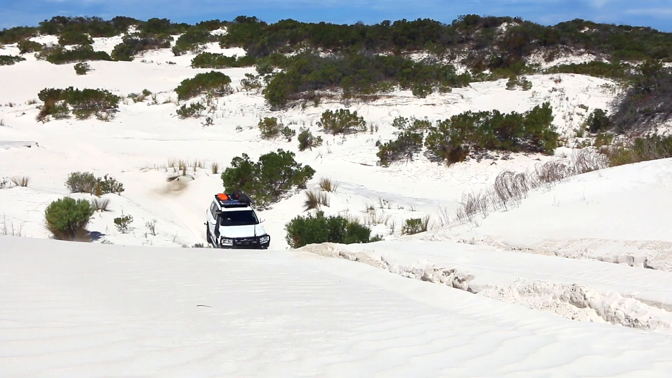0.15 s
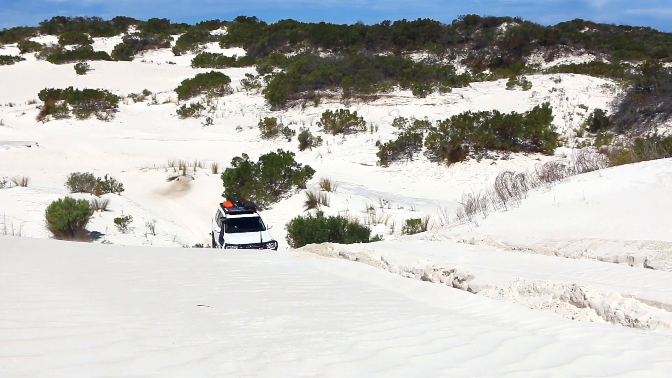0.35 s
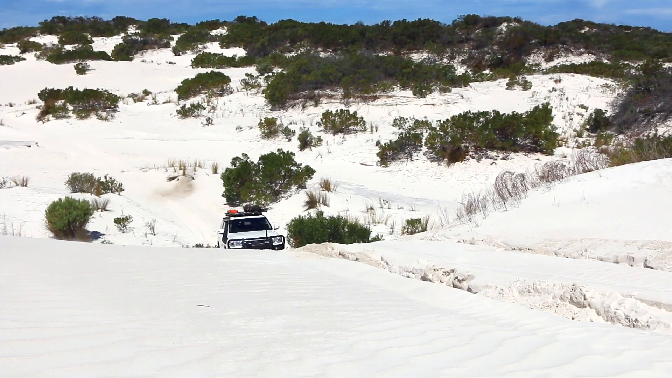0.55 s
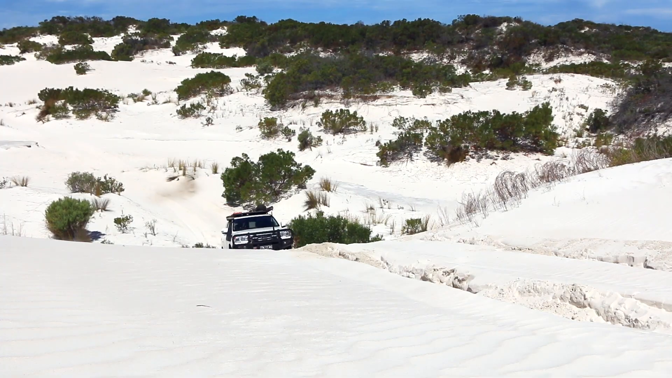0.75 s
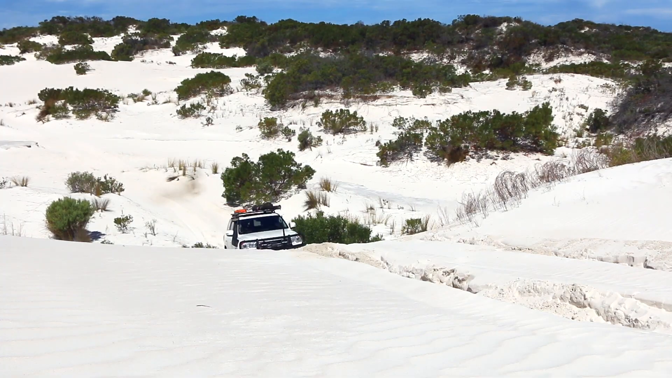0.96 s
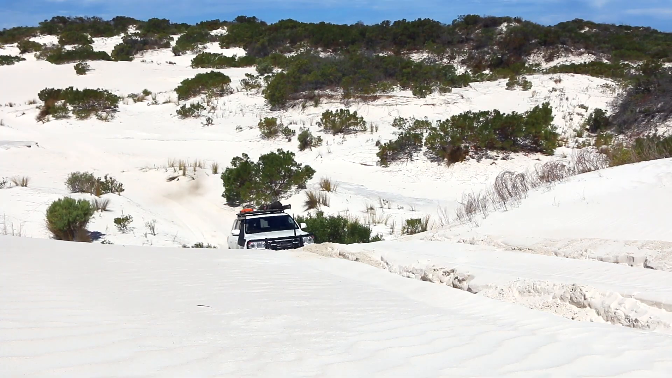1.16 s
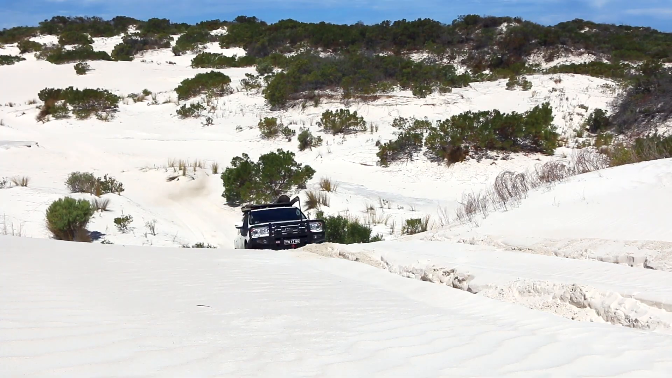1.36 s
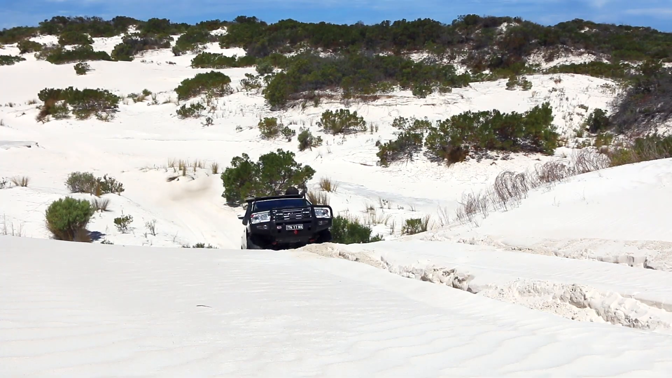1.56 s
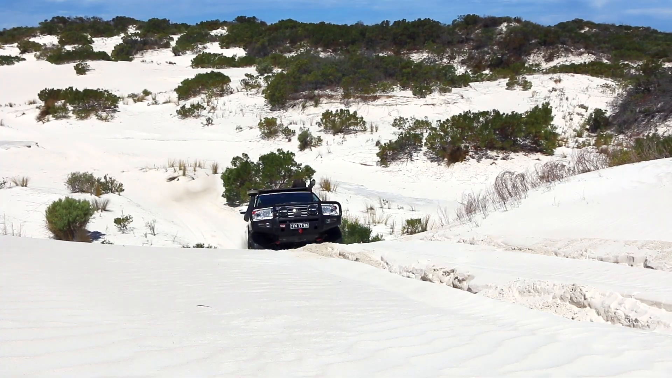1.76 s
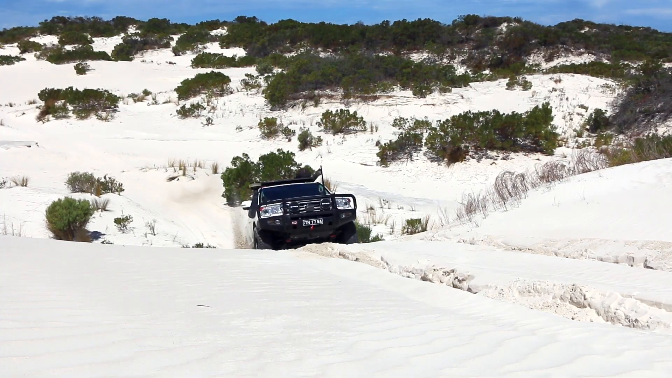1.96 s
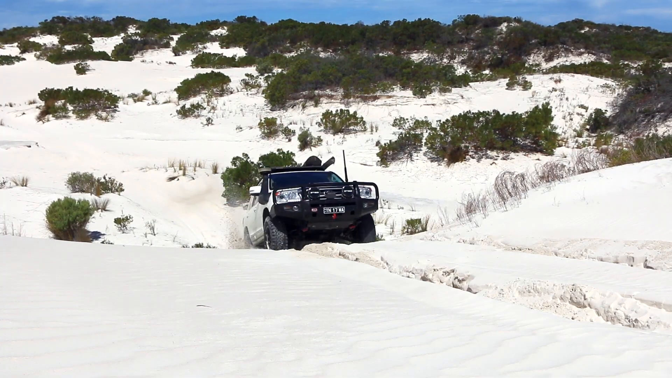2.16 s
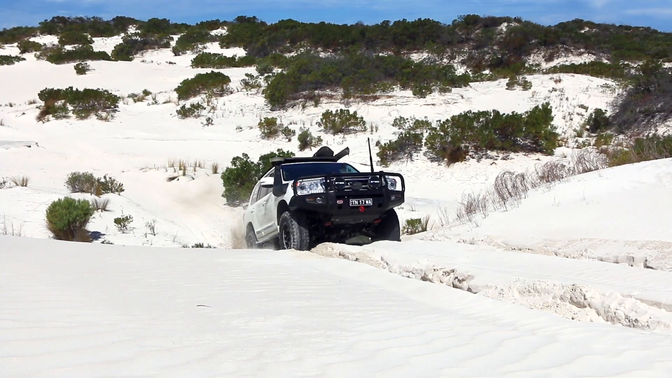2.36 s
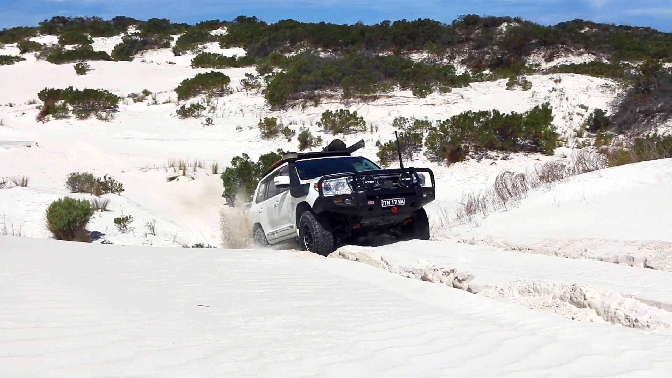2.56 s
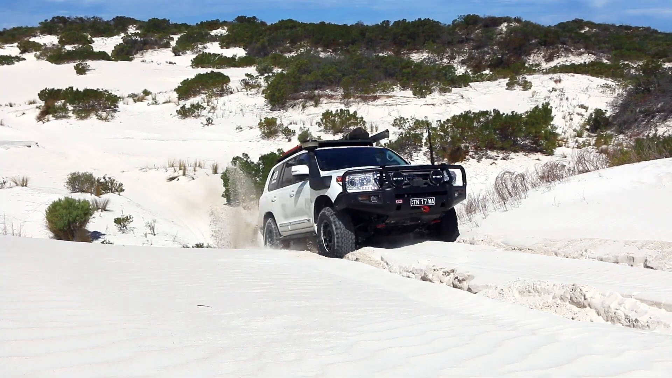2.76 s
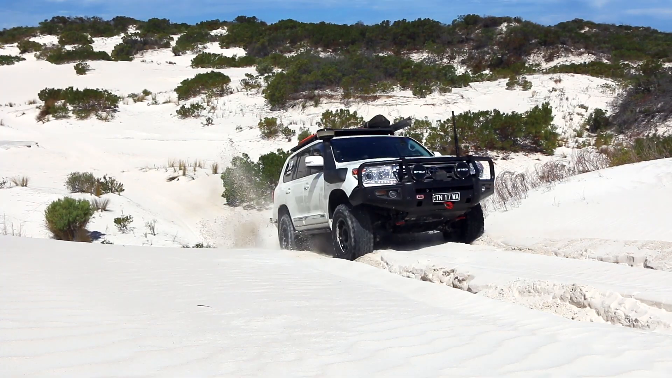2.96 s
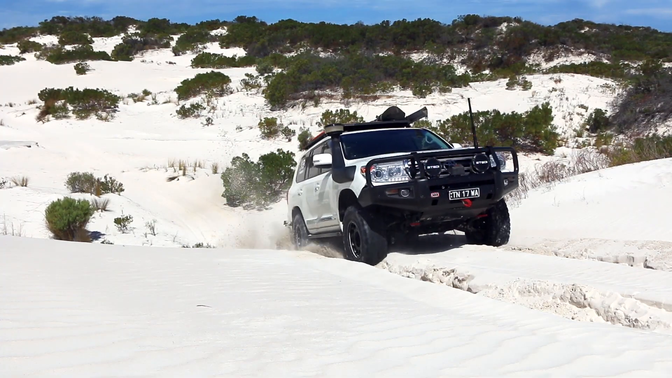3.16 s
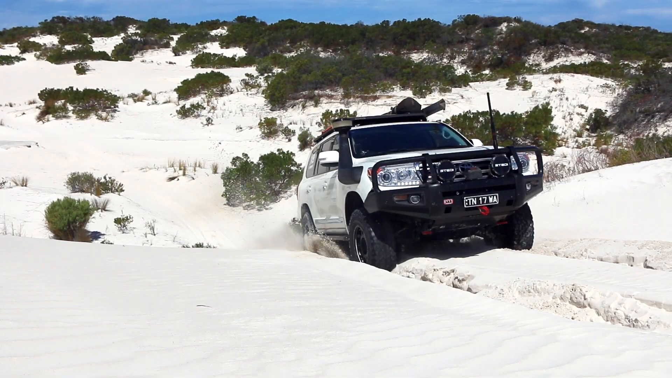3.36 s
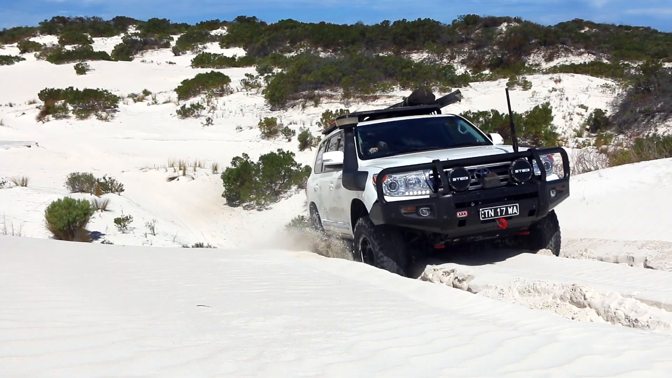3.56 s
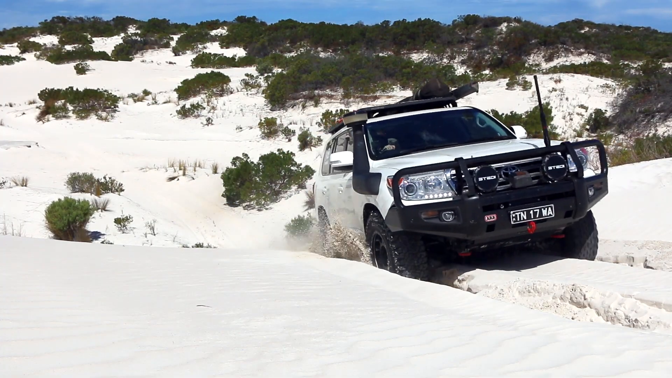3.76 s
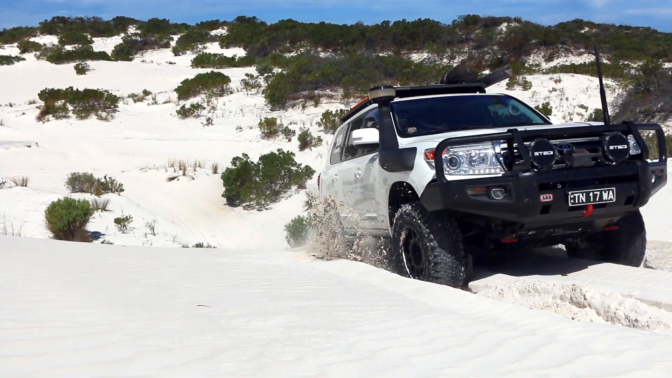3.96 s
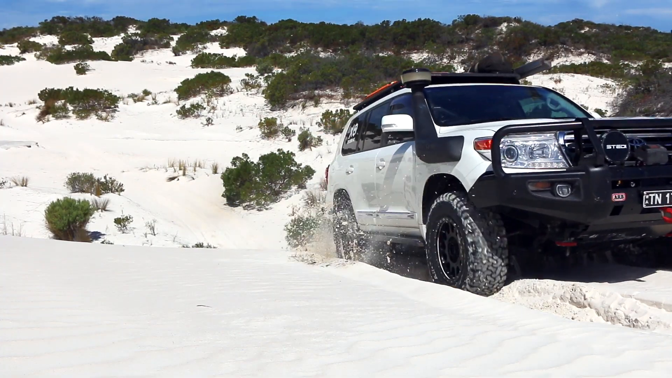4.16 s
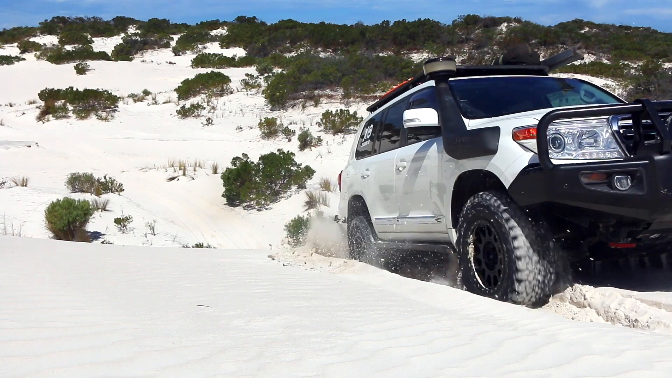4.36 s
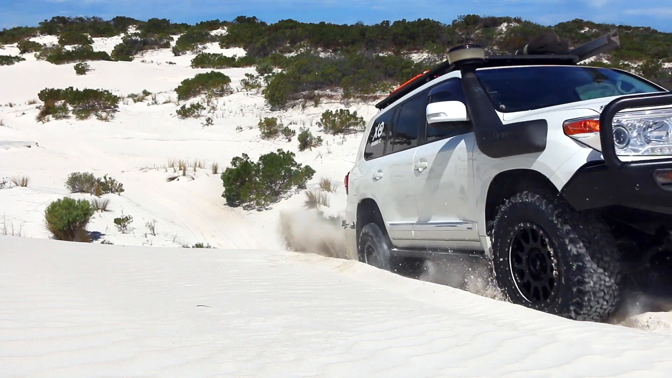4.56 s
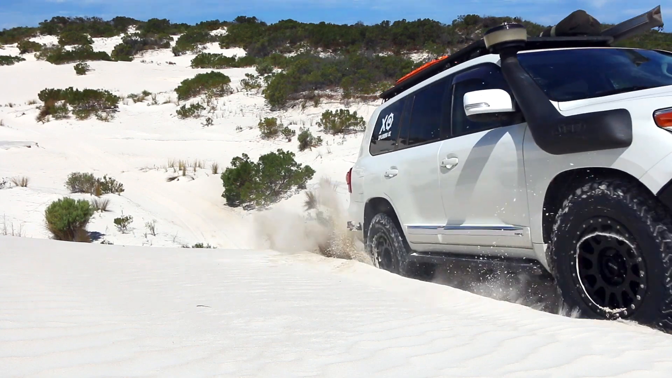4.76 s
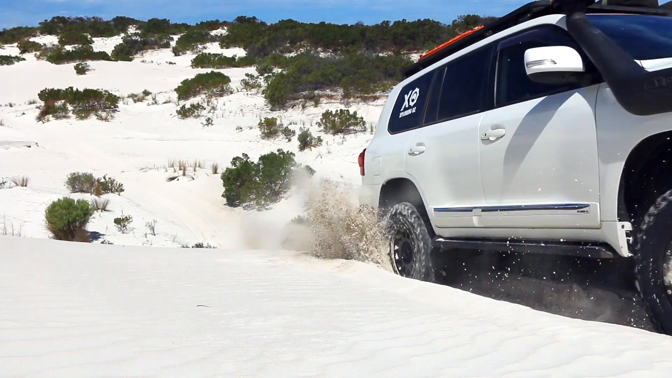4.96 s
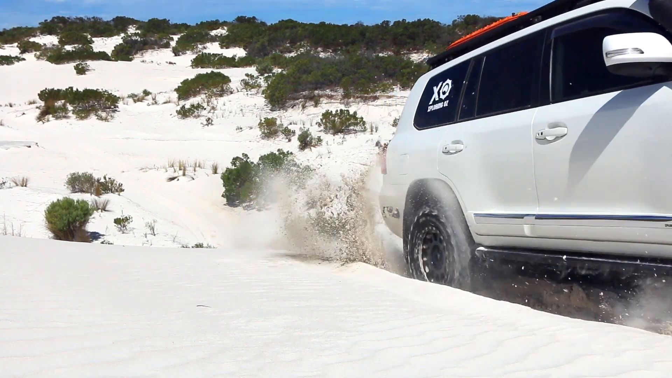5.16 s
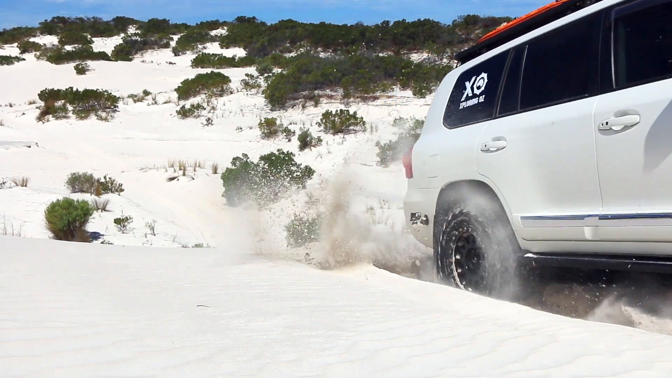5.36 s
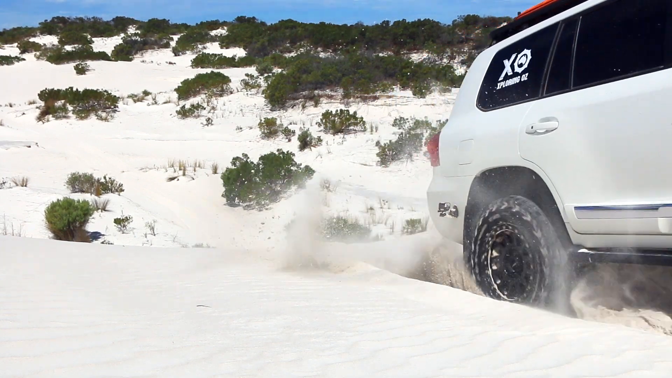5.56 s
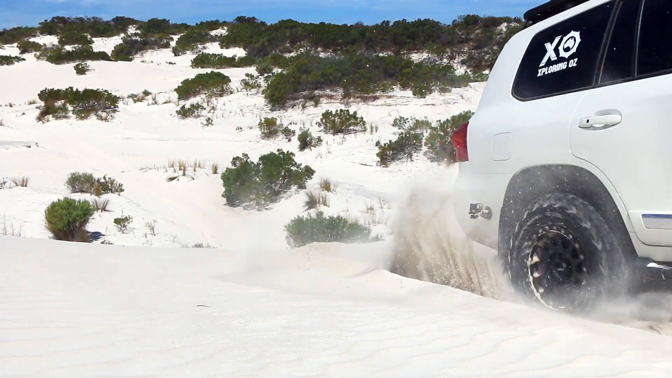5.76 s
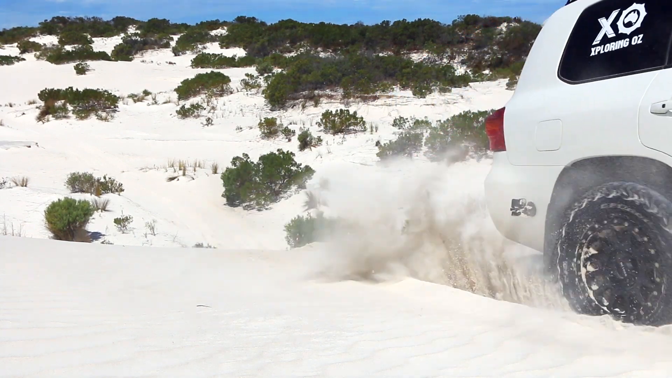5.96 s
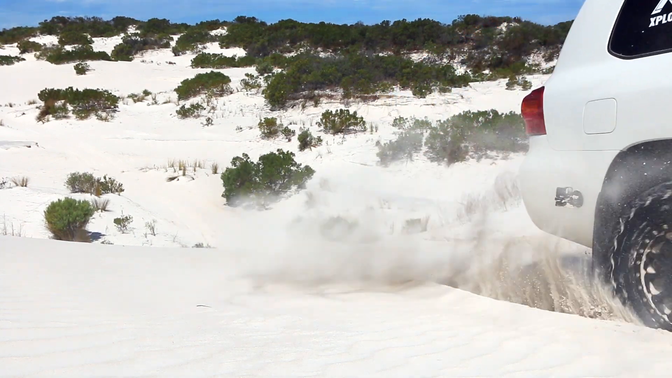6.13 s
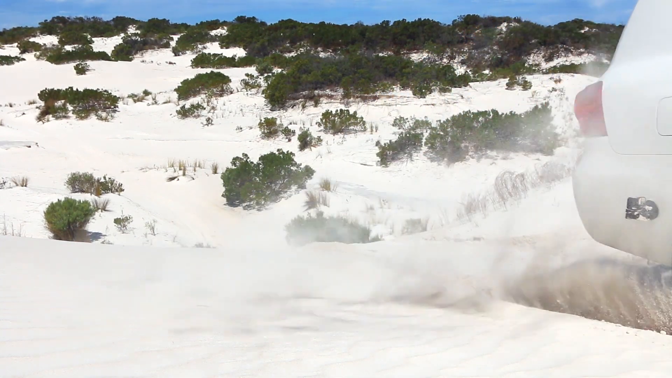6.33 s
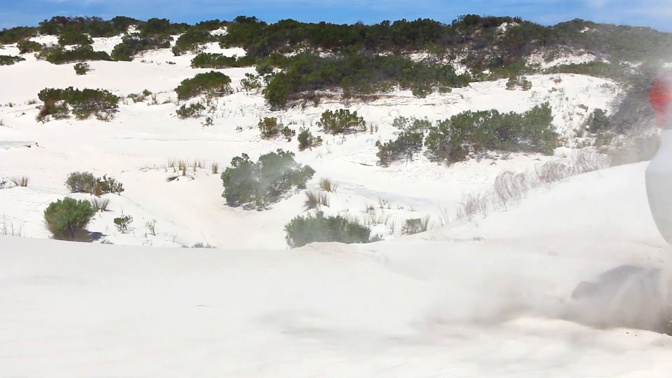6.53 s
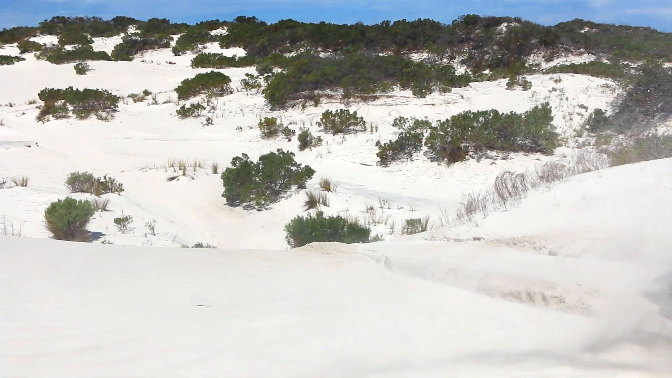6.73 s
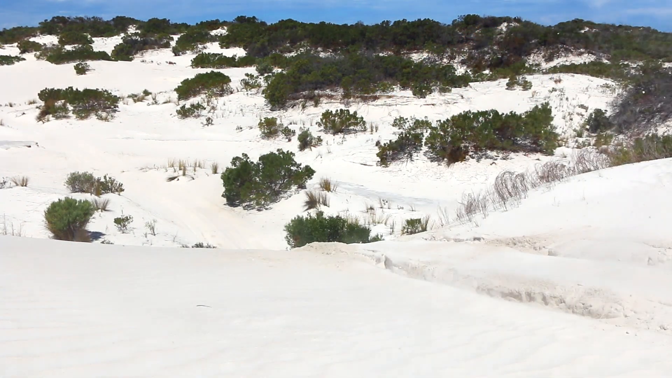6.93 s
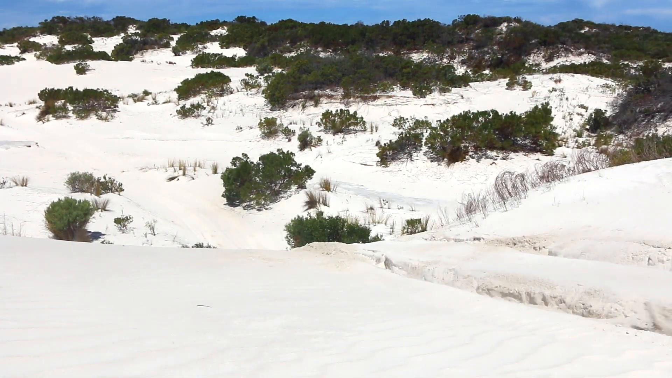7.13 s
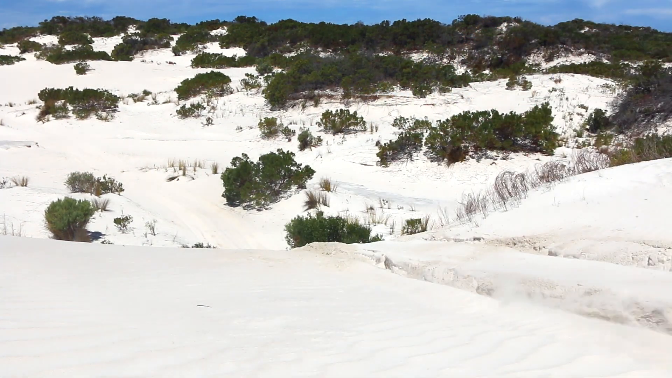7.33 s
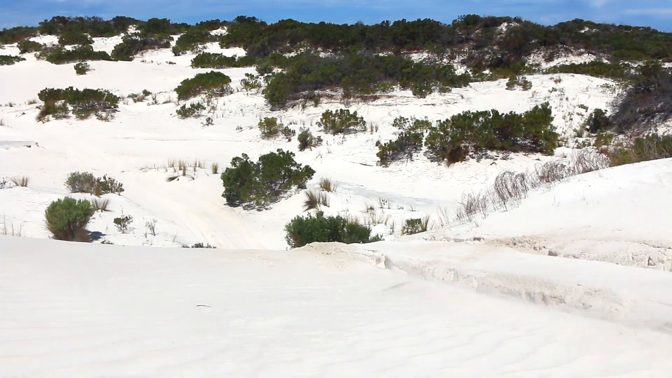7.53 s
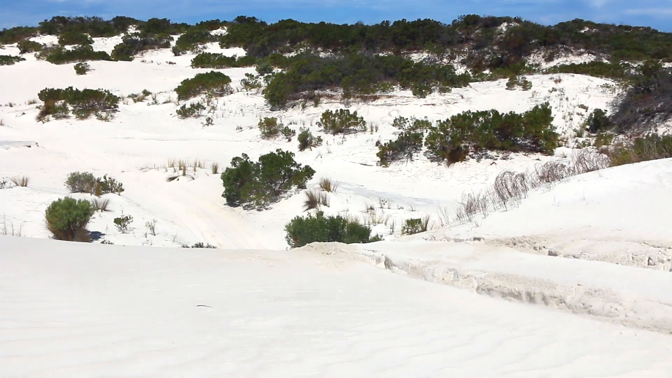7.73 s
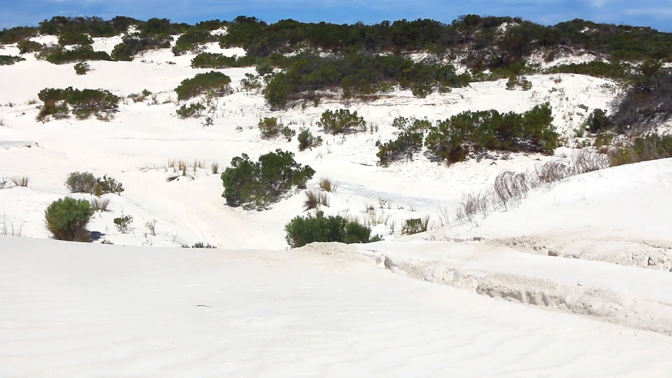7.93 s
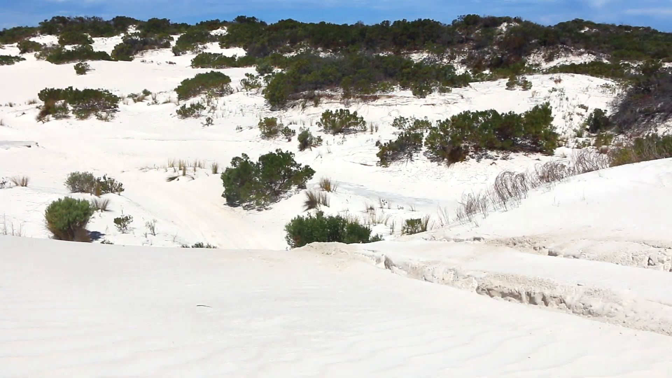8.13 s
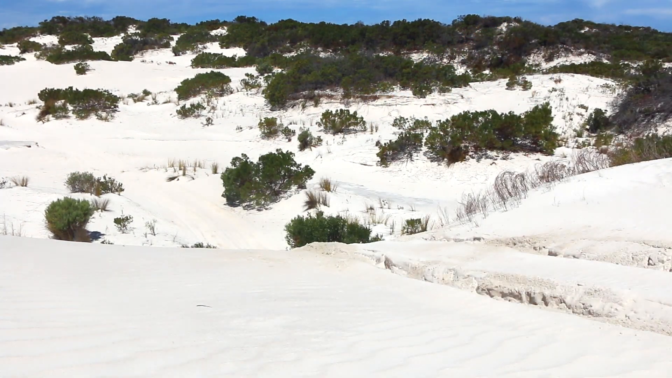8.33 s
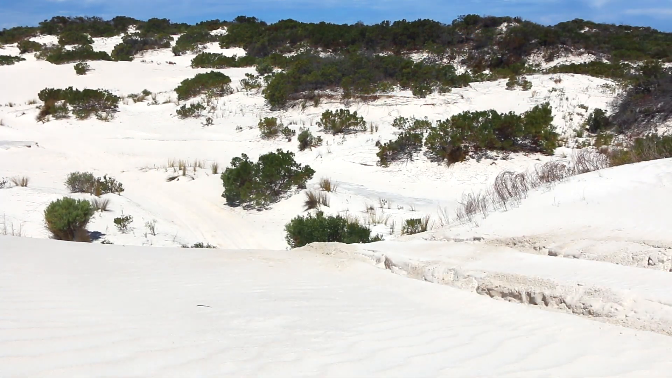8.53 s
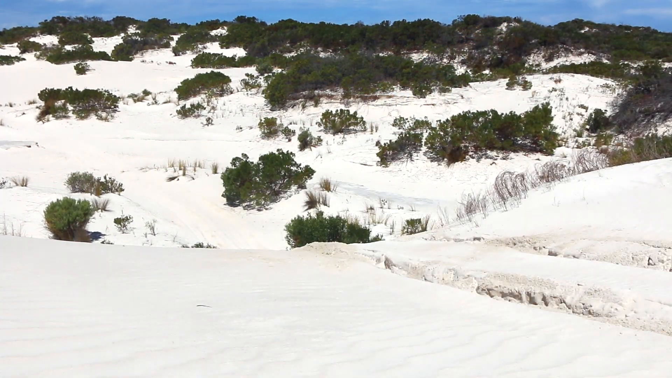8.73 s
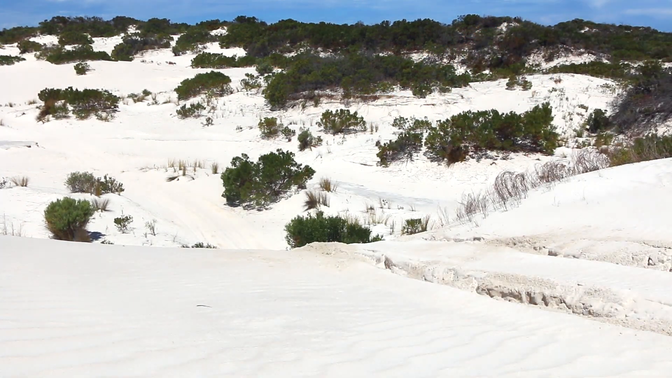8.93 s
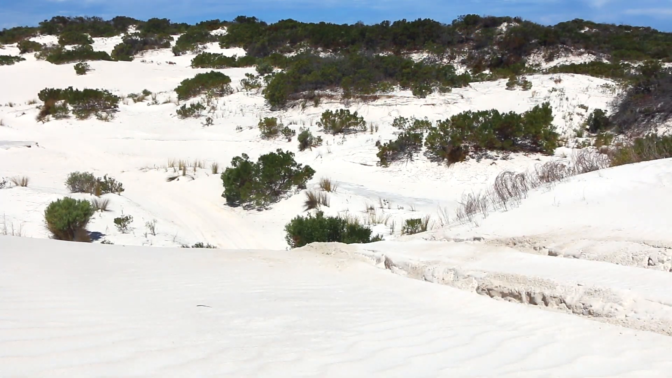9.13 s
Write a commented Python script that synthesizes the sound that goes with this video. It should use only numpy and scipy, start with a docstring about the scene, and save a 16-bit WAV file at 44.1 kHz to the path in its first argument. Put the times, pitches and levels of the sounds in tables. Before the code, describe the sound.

A big diesel four-wheel-drive surges up through soft sand, revs flaring, passes close by, then its deep exhaust drone recedes amid wind rumble.

```python
"""A V8 diesel four-wheel-drive labours up through soft dune sand, its revs surging as the tyres grip and slip.
First comes the fine clatter of its front, noise bursts timed by the firings, with a bright rasp at the crest.
It passes close by; then the tailpipe takes over, sine lines at multiples of the engine cycle and lopsided knocks.
Filtered noise hisses off the wheels as sand, and grains patter down behind the vehicle near the end.
Throughout, low noise in gusts is a breeze rumbling on the microphone."""
import sys
import numpy as np
from scipy.fft import rfft, irfft, next_fast_len
from scipy.io import wavfile
from scipy.ndimage import uniform_filter1d, map_coordinates

SR = 44100
rng = np.random.default_rng(int(sys.argv[2]) if len(sys.argv) > 2 else 0)


def materialize(psi):
    """Save the field psi as 16-bit PCM at rate SR to the path in sys.argv[1].

    A 1-D psi becomes a single channel; in a 2-D psi each row is a channel.
    """
    bounded = np.clip(np.atleast_2d(psi).T, -1, 1)
    quanta = np.round(bounded * 32767).astype(np.int16)
    wavfile.write(sys.argv[1], SR, quanta)


N = 405271  # length in samples

CYLINDERS = 8  # firings in one engine cycle
# How much louder each sound gets, in dB for every Hz of surge
DRONE_DB_PER_HZ, ENGINE_DB_PER_HZ, SPRAY_DB_PER_HZ = 0.26, 0.1367, 0.1382

# Level of the exhaust drone at cruising revs. Each row: time in seconds, level in dB.
DRONE_LEVEL = [(0, -25), (1.2, -28), (1.9, -23.5), (2.65, -29.5), (3.45, -21.5), (3.75, -20.5), (4, -24),
               (4.65, -20.5), (5, -15.5), (5.5, -16.5), (6.35, -10.5), (7.3, -14.5), (7.8, -15),
               (8.25, -22.5), (8.7, -36.5), (8.95, -24.5), (9.19, -27.5)]
# Level of the drone's octave at cruising revs. Each row: time in seconds, level in dB.
OCTAVE_LEVEL = [(0, -60), (1.7, -57.5), (2.75, -37), (3.4, -34), (4.6, -40.5), (6.1, -40.5), (6.6, -30.5),
                (7.8, -32.5), (9.19, -46.5)]
# The low throb carries best from beside and behind. Each row: time in seconds, level in dB.
THROB_LEVEL = [(0, -35.5), (2.6, -36), (3.4, -31), (4.1, -31.5), (5.1, -33), (5.7, -25.5), (7.8, -25.5),
               (9.19, -50)]
# Throb of the two banks. Each row: multiple of the engine cycle, relative level in dB.
THROB_LINES = [(3, -17.5), (4, 1), (5, -5), (6, -2.5)]
# Lines just above the throb. Each row: multiple of the engine cycle, level in dB against the drone's slow swell.
SIDEBAND_LINES = [(10, -12), (11, -15), (12, -21.5)]


def exhaust(firings, surge_hz, tail):
    """A strong drone at the firing rate and its octave swell with the revs, over throb, sidebands and burble."""
    drone_db = curves(DRONE_LEVEL)[0] + DRONE_DB_PER_HZ * surge_hz
    octave_db = curves(OCTAVE_LEVEL)[0] + DRONE_DB_PER_HZ * surge_hz
    drone = amp(drone_db + 0.15 * wobble(25)) * np.sqrt(2) * np.sin(2 * np.pi * firings)
    octave = amp(octave_db) * np.sqrt(2) * np.sin(4 * np.pi * firings)
    throb = amp(curves(THROB_LEVEL)[0]) * orders(firings, THROB_LINES, rough=0.14)
    effort = uniform_filter1d(amp(drone_db), size=SR * 2 // 3)  # the drone's slow swell
    front_cut = amp(-5 * (1 - tail))  # sidebands are weaker from the front
    sidebands = effort * front_cut * orders(firings, SIDEBAND_LINES, rough=0.12)
    return drone + octave + throb + sidebands + pipe_burble(firings, surge_hz, tail)


# The tailpipe nears, turns to face the listener and recedes.
# Each row: time in seconds, burble in dB before a 2 dB cut, roar in dB at cruising throttle.
PIPE_LEVELS = [(0, -40.5, -50), (.65, -45.5, -51.5), (1.5, -36, -46), (2.2, -35.5, -42.5),
               (2.85, -31, -38.5), (3.4, -32.5, -38.5), (3.95, -30.5, -35), (4.2, -26.5, -31),
               (4.7, -26.5, -31.5), (5.1, -31, -32), (5.6, -29.5, -27), (6.5, -27, -31.5),
               (7.3, -21.5, -27), (8.2, -25, -30), (8.8, -34.5, -32.5), (9.19, -33.5, -32.3)]
# Noise colour of the burble. Each row: frequency in Hz, relative level in dB.
BURBLE_COLOUR = [(140, -34.5), (230, -2), (302, -17), (349, -8), (560, -9.5), (730, -48), (1230, -120)]
# Burble lines heard from the front. Each row: multiple of the engine cycle, relative level in dB.
FRONT_BURBLE_LINES = [(13, -8.5), (14, -1), (15, -5.5), (17, -10.5), (18, -9), (21, -13.5)]
# Burble lines heard from the tail. Each row: multiple of the engine cycle, relative level in dB.
TAIL_BURBLE_LINES = [(13, -9), (14, -13), (15, -16.5), (17, -10.5), (18, -19.5), (19, -6), (20, -10.5),
                     (21, -13), (22, -21)]


def pipe_burble(firings, surge_hz, tail):
    """Gas puffs at each firing burble in the pipe; louder ones resolve into pitched lines."""
    burble_db = curves(PIPE_LEVELS)[0] + ENGINE_DB_PER_HZ * surge_hz
    front_lines = orders(firings, FRONT_BURBLE_LINES, rough=0.18)
    tail_lines = orders(firings, TAIL_BURBLE_LINES, rough=0.16)
    lines = blend(front_lines, tail_lines, tail)
    puffs = coloured(bursts(firings, FRONT_CYLINDERS, decay=0.5, steady=0.5, repeat=0), BURBLE_COLOUR)
    clarity = np.interp(burble_db, [-37, -27], [.2, .95])  # faint burble blurs into noise
    return amp(burble_db - 2) * blend(puffs, lines, clarity)


# Reflection off the sand. Each row: time in seconds, lag in ms, strength 0-1.
GROUND_ECHO = [(0, .1, 0.24), (5.8, 0.25, 0), (6.6, 0.3, 0.26), (7.3, 0.39, 0.5), (7.85, 0.49, 0.47),
               (8.2, 0.54, 0.18), (8.6, 1.2, 0.08), (9.19, 1.5, 0.6)]


def machinery(firings, demand_hz, front_db, tail):
    """Gas roars in the pipe while each combustion knocks the block and rattles its covers; all follow the throttle."""
    low_bands = pipe_roar(firings, tail) + nasal_ring(firings, front_db) + clatter(firings, front_db)
    mirrored = with_echo(low_bands, GROUND_ECHO)  # rough sand mirrors only the lower bands
    throttle = amp(ENGINE_DB_PER_HZ * demand_hz + .5 * wobble(7))
    return throttle * (mirrored + block_knock(firings, front_db))


# Noise colour of the roar. Each row: frequency in Hz, relative level in dB.
ROAR_COLOUR = [(290, -21.5), (500, -6), (534, -11), (611, 2.5), (775, -1.5), (865, -0.5), (1100, -2),
               (1430, -39.5), (2420, -120)]
# Growl within the roar. Each row: multiple of the engine cycle, relative level in dB.
GROWL_LINES = [(24, -2), (25, -7), (26, -7), (27, -9.5), (28, -14), (29, -9.5), (31, -14), (36, -9.5),
               (37, -12.5), (42, -10)]
# How pitched the roar is. Each row: time in seconds, share that is growl 0-1.
GROWL_SHARE = [(0, 0.33), (4.8, 0.19), (5.8, 0.45), (7.5, 0.47), (8.6, 0), (9.19, 0.06)]


def pipe_roar(firings, tail):
    """Gas pulses roar as noise bursts, mixed with a pitched growl of engine-cycle multiples."""
    gas = blend(from_front(firings, ROAR_COLOUR), from_tail(firings, ROAR_COLOUR), tail ** 3)
    growl = unit(orders(firings, GROWL_LINES, rough=0.27))
    return amp(curves(PIPE_LEVELS)[1]) * blend(gas, growl, curves(GROWL_SHARE)[0])


# Engine bay at the closest point, in dB before shading, at cruising throttle
NASAL_DB, CLATTER_DB, BLOCK_DB = -35.5, -34.5, -38.5
# Knocking heard from behind, at cruising throttle.
# Each row: time in seconds, rattle and nasal level in dB, high ring in dB.
REAR_LEVELS = [(0, -75, -81.5), (4.4, -50, -68), (5.5, -36, -45.5), (6.65, -40, -56), (7.4, -35.5, -56),
               (7.9, -33, -50.5), (8.4, -36.5, -45), (8.8, -41.5, -46), (9.19, -48, -55.5)]
# The nasal resonance. Each row: frequency in Hz, relative level in dB.
NASAL_COLOUR = [(500, -100), (900, -26), (1100, -6), (1220, 3), (1330, 0.5), (1500, -8.5), (1800, -26),
                (3500, -110)]
# The nasal resonance swells from the front. Each row: time in seconds, rise in dB, half length in seconds.
NASAL_SWELLS = [(3.22, 5.5, 0.29), (3.87, 5, 0.17), (5.05, 8.5, 0.25), (6.22, 7.5, .3)]


def nasal_ring(firings, front_db):
    """Combustion excites a nasal resonance, in uneven swells from the front and steadier from behind."""
    ahead_db = front_db + NASAL_DB + swells(NASAL_SWELLS) + 0.79 * wobble(12)
    ahead = amp(ahead_db) * from_front(firings, NASAL_COLOUR)
    behind = amp(curves(REAR_LEVELS)[0]) * from_tail(firings, NASAL_COLOUR)
    return ahead + behind


# Clatter colour from the front. Each row: frequency in Hz, relative level in dB.
FRONT_CLATTER_COLOUR = [(850, -30.5), (1450, -3), (1710, 1), (1910, -4.5), (2100, -1), (2590, -7.5),
                        (2800, -16), (3640, -40), (6160, -120)]
# Clatter colour from the tail. Each row: frequency in Hz, relative level in dB.
TAIL_CLATTER_COLOUR = [(850, -25), (1450, 0), (1730, -1), (2090, -6), (2330, -8.5), (2800, -24),
                       (3640, -48.5), (6160, -120)]


def clatter(firings, front_db):
    """Each combustion rattles the engine's covers."""
    ahead = amp(front_db + CLATTER_DB) * from_front(firings, FRONT_CLATTER_COLOUR)
    behind = amp(curves(REAR_LEVELS)[0]) * from_tail(firings, TAIL_CLATTER_COLOUR)
    return ahead + behind


# High ring of the block from the front. Each row: frequency in Hz, relative level in dB.
FRONT_BLOCK_COLOUR = [(1530, -29), (2600, -2), (3210, 2), (3670, -2), (4210, -10), (5600, -36.5),
                      (7280, -48), (12300, -120)]
# High ring of the block from the tail. Each row: frequency in Hz, relative level in dB.
TAIL_BLOCK_COLOUR = [(1530, -35.5), (2600, -3), (3050, -5.5), (3400, -0.5), (3700, 2.5), (4100, -7),
                     (4700, -11), (5600, -23.5), (7300, -50.5), (12000, -120)]


def block_knock(firings, front_db):
    """Each combustion knocks the block into a high ring."""
    ahead = amp(front_db + BLOCK_DB) * from_front(firings, FRONT_BLOCK_COLOUR)
    behind = amp(curves(REAR_LEVELS)[1]) * from_tail(firings, TAIL_BLOCK_COLOUR)
    return ahead + behind


# Nearly even firing strengths from the engine bay. Each entry: one firing in turn, strength in dB.
FRONT_CYLINDERS = [0.92, -0.64, .5, -1, .5, 1, -0.083, -.5]


def from_front(firings, colour):
    """Fine, even clatter from the engine bay."""
    return coloured(bursts(firings, FRONT_CYLINDERS, decay=0.28, steady=2.9, repeat=0.1), colour)


# Uneven firing strengths from the tail, two of them hard. Each entry: one firing in turn, strength in dB.
TAIL_CYLINDERS = [-3, 0, 5.2, -2, -3, 0, 6.2, -1.5]


def from_tail(firings, colour):
    """A lopsided knock from the tail."""
    return coloured(bursts(firings, TAIL_CYLINDERS, decay=0.75, steady=0.22, repeat=0.22), colour)


# Single hard knocks. Each row: start in seconds, peak of the envelope in dB before a 3 dB cut.
KNOCK_TIMES = [(6.782, -21.5), (6.911, -24), (8.092, -19.5), (8.999, -28), (9.02, -24.5), (9.082, -25)]
# Ring of a knock. Each row: frequency in Hz, relative level in dB.
KNOCK_COLOUR = [(200, -73), (500, -3), (800, 3.5), (1800, -2.5), (2800, -14.5), (3700, -15.5), (5000, -38),
                (12000, -71)]


def hard_knocks():
    """Single impacts as the vehicle draws away, each a short ringing burst."""
    return taps(KNOCK_TIMES, KNOCK_COLOUR, t60=.025, gain_db=-3)


# The revs flare each time the tyres slip.
# Each row: time in seconds, rise of the firing rate in Hz, half length in seconds.
SURGES = [(.15, 13.9, .38), (1.138, 36.5, .22), (1.88, 24.6, .23), (2.5, 27, .27), (3.21, 19.4, .26),
          (3.69, 9.4, .18), (4.242, 17, .17), (4.655, 14.2, .26), (5.189, 21.8, .16), (5.78, 10, .17),
          (6.376, 5.6, .15), (7.367, 1.29, 0.3), (9.098, 1.21, .4)]
CRUISE_HZ = 190  # firing rate between surges
THROTTLE_LEAD_S = 0.093  # the throttle opens this long before the revs follow


def revs():
    """Running count of firings, the surge of the revs and the earlier surge that the throttle calls for."""
    surge_hz = swells(SURGES)
    demand_hz = swells([(s - THROTTLE_LEAD_S, rise, half) for s, rise, half in SURGES])
    firings = np.cumsum(CRUISE_HZ + surge_hz) / SR
    return firings, surge_hz, demand_hz


# A dune crest hides the engine bay at first, the vehicle's own body afterwards.
# Each row: time in seconds, shading in dB.
SHADING = [(0, -9), (.8, -11.5), (2.7, 0), (5.6, -1), (6.6, -8.5), (9.19, -9.5)]
# The front of the vehicle passes the listener: time, distance and speed
PASS_S, CLOSEST_M, SPEED_M_PER_S = 5.15, 4.12, 2.3


def approach():
    """Level of the front in dB against its unshaded closest point: spreading with distance, and shading."""
    distance_m = np.hypot(CLOSEST_M, SPEED_M_PER_S * (np.arange(N) / SR - PASS_S))
    return 20 * np.log10(CLOSEST_M / distance_m) + curves(SHADING)[0]


# The tyres' hiss turns hollow as the vehicle draws away.
# Each row: time in seconds, echo lag in ms, signed strength.
HOLLOW_ECHO = [(0, 0.089, 0.1), (6.801, 0.14, -0.13), (7.55, 0.19, -0.021), (7.95, .255, -0.54),
               (8.35, .31, -0.2), (8.8, 0.4, -0.11), (9.19, .5, -0.14)]


def sand(demand_hz, front_db):
    """Spray, rasp and patter mix with a short echo; nearby ticks stay dry."""
    airborne = tyre_spray(demand_hz, front_db) + wheel_rasp() + sand_patter()
    return with_echo(airborne, HOLLOW_ECHO) + sand_ticks()


# Colour of the spray. Each row: frequency in Hz, relative level in dB.
SPRAY_COLOUR = [(2820, -27), (4800, -1.5), (5350, -5), (12500, -17), (15600, -21)]
# A wheel digs in and throws extra sand. Each row: time in seconds, rise in dB, half length in seconds.
THROWS = [(1.06, 4, .12), (1.76, 3, .06), (3.28, 2.5, 0.14), (5.1, 2, 0.13), (5.55, 1.5, 0.12),
          (6.5, 3.5, 0.67)]
SPRAY_DB = -50  # at the closest point before shading, at cruising throttle


def tyre_spray(demand_hz, front_db):
    """The tyres throw a fine hiss of noise and equal grains, more as they spin."""
    spray_db = SPRAY_DB + front_db + SPRAY_DB_PER_HZ * demand_hz + swells(THROWS)
    specks = unit(grains(per_second=3000, spread_db=0.0))
    hiss = coloured(rng.standard_normal(N) + 0.73 * specks, SPRAY_COLOUR)
    return amp(spray_db + 0.48 * wobble(30)) * hiss


# Level of the rasp. Each row: time in seconds, level in dB.
RASP_LEVEL = [(.6, -76), (.95, -49.5), (1.25, -46.5), (1.45, -58), (1.7, -56), (2.7, -46), (3.3, -58),
              (4, -100)]
# Its two resonances. Each row: frequency in Hz, relative level in dB.
RASP_COLOUR = [(1500, -35.5), (2000, -4), (2150, 2.5), (2450, -9.5), (3100, -12.5), (3650, -1.5),
               (3950, -10.5), (4400, -17.5), (7000, -21), (12000, -59)]


def wheel_rasp():
    """A bright rasp of resonant noise as the vehicle charges the crest with its wheels spinning."""
    return amp(curves(RASP_LEVEL)[0]) * coloured(rng.standard_normal(N), RASP_COLOUR)


# Thrown sand comes down around the listener. Each row: time in seconds, patter in dB.
SANDFALL_LEVEL = [(0, -100), (5.5, -78.5), (7.4, -68.5), (7.85, -62.5), (8.3, -55.5), (8.8, -56.5),
                  (8.95, -60.5), (9.19, -62.5)]
# Clumps within that fall. Each row: time in seconds, rise in dB, half length in seconds.
CLUMPS = [(8.44, 3.5, .03), (8.56, 3.5, .02), (8.66, 4.5, .015), (8.82, 7.5, 0.044), (9.17, 7, 0.033)]
# Colour of the patter. Each row: frequency in Hz, relative level in dB.
PATTER_COLOUR = [(2820, -35), (4800, -2.5), (5120, -11.5), (5650, -0.5), (6300, -0.5), (7360, -5.5),
                 (8170, -1), (10400, -0.5), (11600, 3.5), (12200, -3.5), (12700, -10.5), (14500, -4.5),
                 (15600, -16)]


def sand_patter():
    """Once the wheels have passed, falling grains of uneven size patter down over a bed of noise."""
    patter_db = curves(SANDFALL_LEVEL)[0] + swells(CLUMPS)
    falling = unit(grains(per_second=1100, spread_db=3))
    patter = coloured(rng.standard_normal(N) + 2 * falling, PATTER_COLOUR)
    return amp(patter_db + 1.2 * wobble(35)) * patter


# Larger grains landing close by. Each row: start in seconds, peak of the envelope in dB before a 7 dB cut.
TICK_TIMES = [(8.1141, -41.5), (8.2582, -42), (8.3301, -42.5), (8.3855, -43), (8.558, -43), (8.5975, -34),
              (8.6648, -47.5), (8.7501, -51.5), (8.7661, -46), (8.807, -37), (8.8309, -30), (8.8898, -45.5)]
# Ring of a tick. Each row: frequency in Hz, relative level in dB.
TICK_COLOUR = [(1200, -86), (3000, -24), (3700, 0.5), (4600, -12), (7500, -26), (9300, -18), (10300, -8),
               (11700, 6), (12900, -11.5), (14300, -13.5), (15700, -20)]


def sand_ticks():
    """Larger grains land close by, each a tiny bright burst."""
    return taps(TICK_TIMES, TICK_COLOUR, t60=.022, gain_db=-7)


# Colour of the rumble. Each row: frequency in Hz, relative level in dB.
BUFFET_COLOUR = [(12, -34.5), (25, -20), (42, -12), (72, -3.5), (110, -6), (160, -8), (250, -13.5),
                 (400, -24.5), (900, -72), (3000, -120)]
# Gusts. Each row: time in seconds, rise in dB, half length in seconds.
GUSTS = [(.22, 6.5, 0.47), (.82, 5, 0.22), (1.4, 8, .22), (1.96, 11.5, 0.26), (2.8, 4.5, 0.22),
         (3.95, 8.5, 0.29), (4.33, 5.5, 0.1), (4.88, 6, 0.18), (7.02, 12.5, 0.12), (7.4, 4.5, 0.089),
         (8.58, 9.5, 0.26), (9.17, 7, .15)]
BREEZE_DB = -31  # between gusts


def wind():
    """A breeze buffets the microphone in lumps of low noise, harder in the gusts."""
    rumble = coloured(rng.standard_normal(N), BUFFET_COLOUR)
    lumps = unit(amp(1.4 * wobble(14)) * rumble)
    return amp(BREEZE_DB + swells(GUSTS)) * lumps


def bursts(firings, cylinders, decay, steady, repeat):
    """Noise flares at each firing and decays by 1/e in the share decay of its period; a share repeats every cycle."""
    index = firings.astype(int)
    scatter_db = .9 * rng.standard_normal(index[-1] + 1)  # no two firings are equally strong
    size = amp(np.take(cylinders, index % len(cylinders)) + scatter_db[index])
    signature = rng.standard_normal(SR // 24)  # one cycle of noise
    place = firings / len(cylinders) % 1 * len(signature)
    recurring = map_coordinates(signature, [place], mode="grid-wrap")
    flare = size * np.exp(-(firings % 1) / decay)
    return blend(rng.standard_normal(N), recurring, repeat) * (steady + flare)


def orders(firings, table, rough):
    """Uneven firing makes lines at multiples of the engine cycle; each flutters by itself in level and phase."""
    cycle = firings / CYLINDERS
    out, knots = np.zeros(N), np.linspace(0, N, 90)
    for multiple, db in table:
        flutter = rough * rng.standard_normal((2, len(knots)))
        gain, slip = [np.interp(np.arange(N), knots, row) for row in flutter]
        out += amp(db) * (1 + gain) * np.sin(2 * np.pi * (multiple * cycle + rng.random()) + slip)
    return np.sqrt(2) * out


def taps(table, ring, t60, gain_db):
    """Short impacts: each is a burst of noise, dying by 60 dB in t60 seconds, in the struck thing's colour."""
    envelope, t = np.zeros(N + SR), np.arange(SR // 20) / SR
    for s, db in table:
        envelope[round(s * SR):][:len(t)] += amp(db + gain_db - 60 * t / t60)
    hits = envelope[:N] * rng.standard_normal(N)
    return np.std(hits) * coloured(hits, ring)


def grains(per_second, spread_db):
    """Sparse impacts of either sign; a spread above zero makes a few of them large."""
    landed = rng.random(N) < per_second / SR
    size = amp(spread_db * np.minimum(rng.exponential(size=N), 5))
    return landed * rng.choice([-1, 1], N) * size


def with_echo(x, path):
    """Adding a delayed copy cuts notches in the sound, which sweep down as the lag grows."""
    lag_ms, strength = curves(path)
    copy = map_coordinates(x, [np.arange(N) - lag_ms * SR / 1000], mode="nearest")
    return (x + strength * copy) / np.sqrt(1 + strength ** 2)


def swells(rows):
    """A sum of bell-shaped rises, each falling to 1/e at its half length."""
    t = np.arange(N) / SR
    return sum(height * np.exp(-((t - s) / half) ** 2) for s, height, half in rows)


def curves(rows):
    """One value per sample for each column after the time."""
    s, *cols = np.transpose(rows)
    return [np.interp(np.arange(N) / SR, s, c) for c in cols]


def wobble(rate):
    """A smooth random curve, rate knots a second."""
    knots = rng.standard_normal(int(N * rate / SR) + 4)
    return map_coordinates(knots, [np.arange(N) * rate / SR], mode="nearest")


def blend(first, second, share):
    """Equal-power mix with the given share of the second sound."""
    share = np.clip(share, 0, 1)
    return np.sqrt(1 - share) * first + np.sqrt(share) * second


def coloured(x, spectrum):
    """x shaped by (Hz, dB) points, at rms 1."""
    f, db = np.transpose(spectrum)
    return unit(filtered(x, lambda hz: amp(np.interp(np.log(hz + 1), np.log(f + 1), db))))


def filtered(x, response):
    """x times a response of frequency."""
    m = next_fast_len(N + SR // 2)
    return irfft(rfft(x, m) * response(np.fft.rfftfreq(m, 1 / SR)), m)[:N]


def amp(db):
    """Decibels to gain."""
    return 10 ** (np.asarray(db) / 20)


def unit(x):
    """Scale to rms 1."""
    return x / np.sqrt(np.mean(x ** 2) + 1e-20)


# The listener hears more of the tail as the vehicle passes.
# Each row: time in seconds, share of the sound that comes from the tail 0-1.
TAIL_SHARE = [(0, 0), (4.6, 0.25), (5.6, 0.54), (6.6, 0.84), (9.19, 0.91)]


def scene():
    """One crankshaft times the engine's firings; throttle, revs and the vehicle's approach set the levels."""
    firings, surge_hz, demand_hz = revs()
    front_db = approach()
    tail = curves(TAIL_SHARE)[0]
    engine = exhaust(firings, surge_hz, tail) + machinery(firings, demand_hz, front_db, tail)
    return (engine + hard_knocks() + sand(demand_hz, front_db) + wind())[None]


def record(dry):
    """The recorder rounds off the highest peaks and keeps nothing above its band limit."""
    ceiling, hardness, top_hz = .58, 10, 15720
    rounded = dry[0] / (1 + np.abs(dry[0] / ceiling) ** hardness) ** (1 / hardness)
    return filtered(rounded, lambda hz: hz < top_hz)[None]


dry = scene()
out = record(dry)
materialize(out)
```